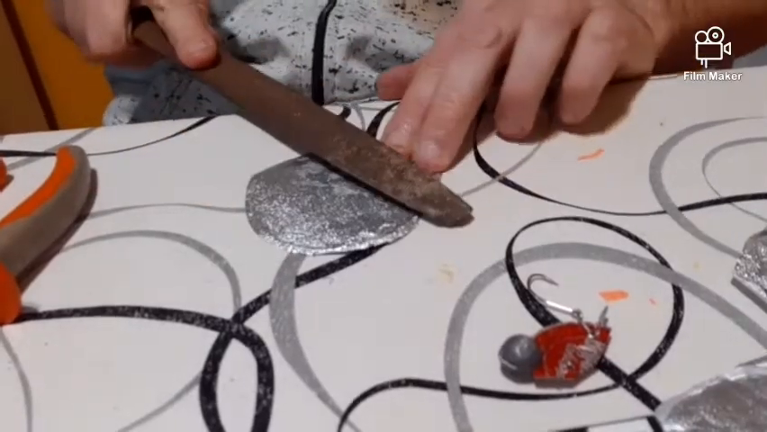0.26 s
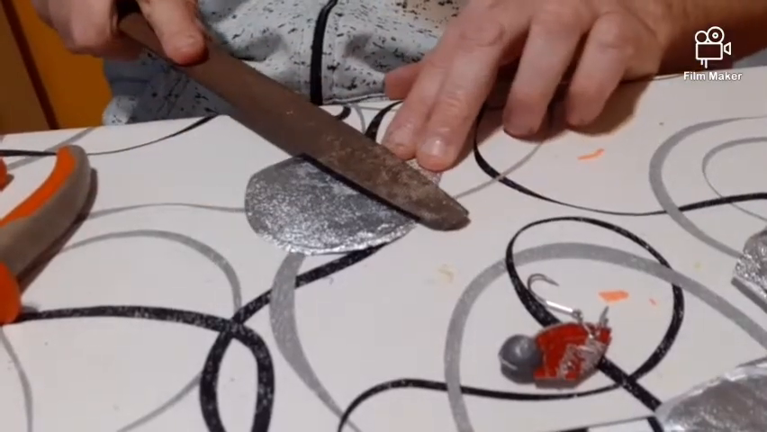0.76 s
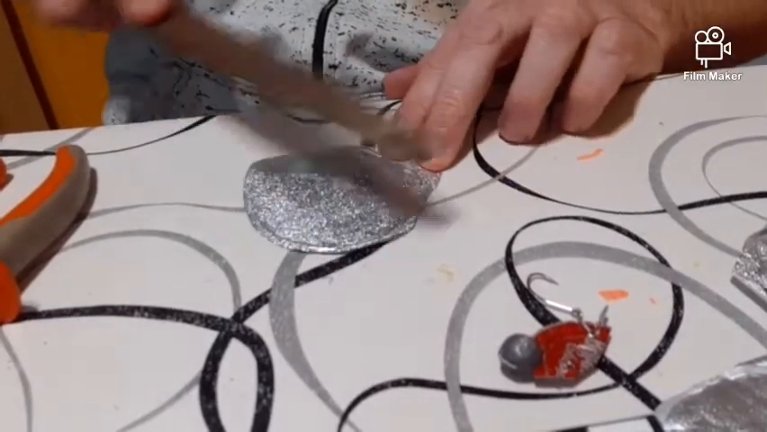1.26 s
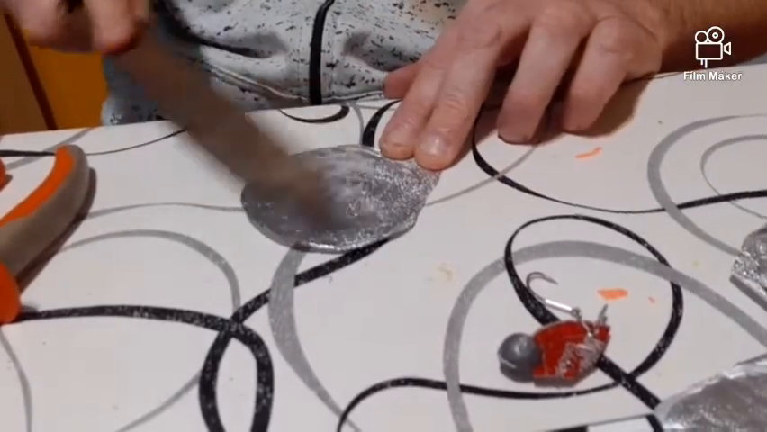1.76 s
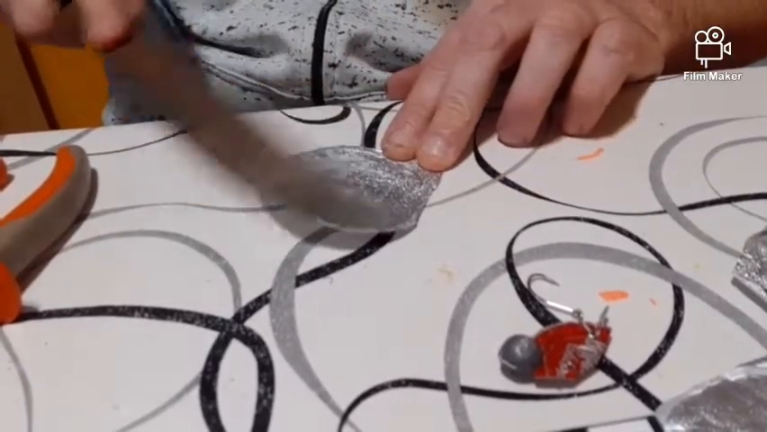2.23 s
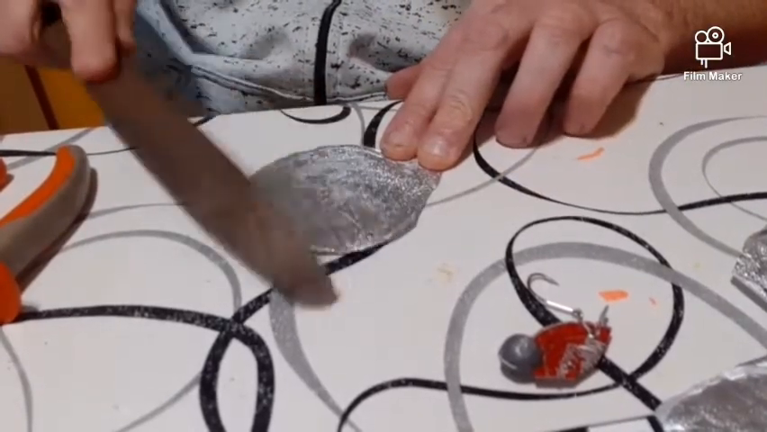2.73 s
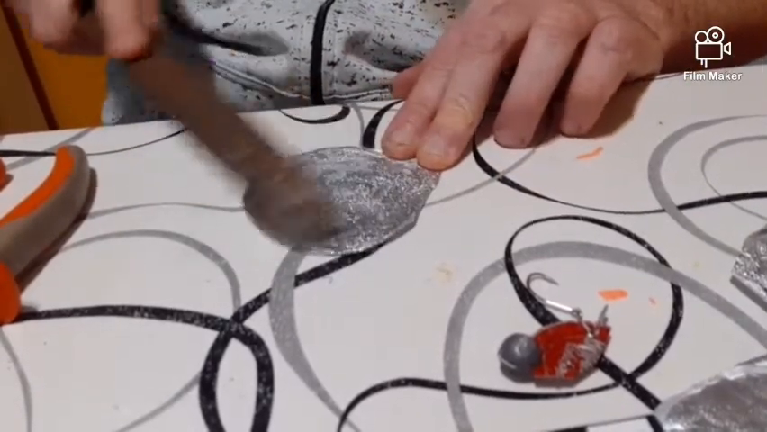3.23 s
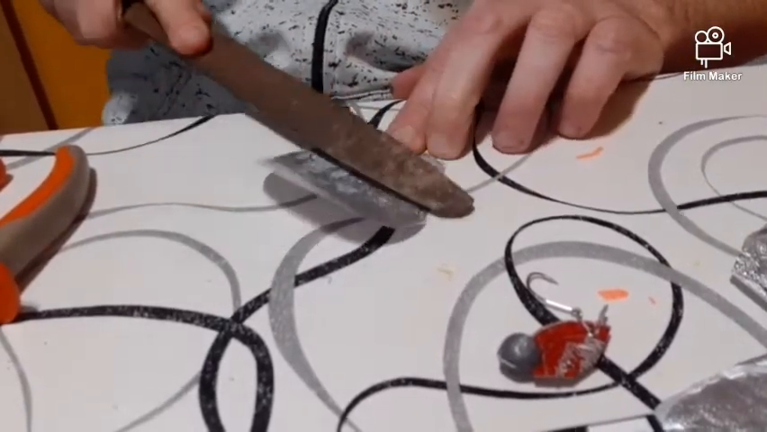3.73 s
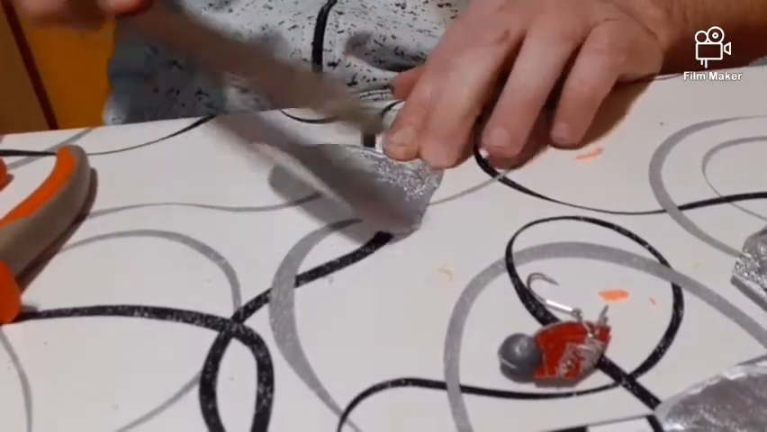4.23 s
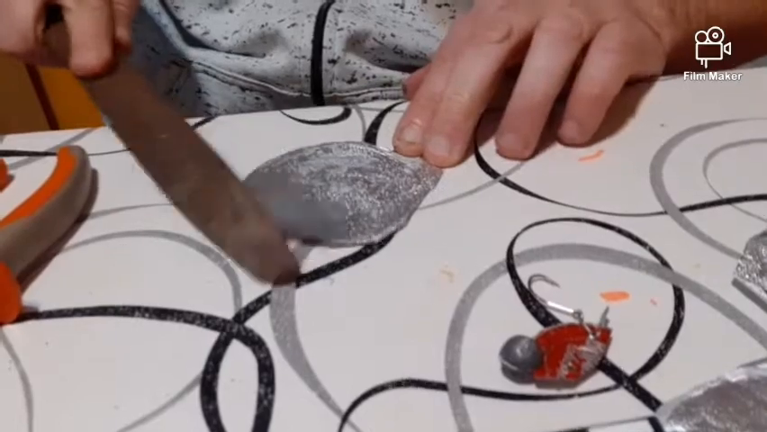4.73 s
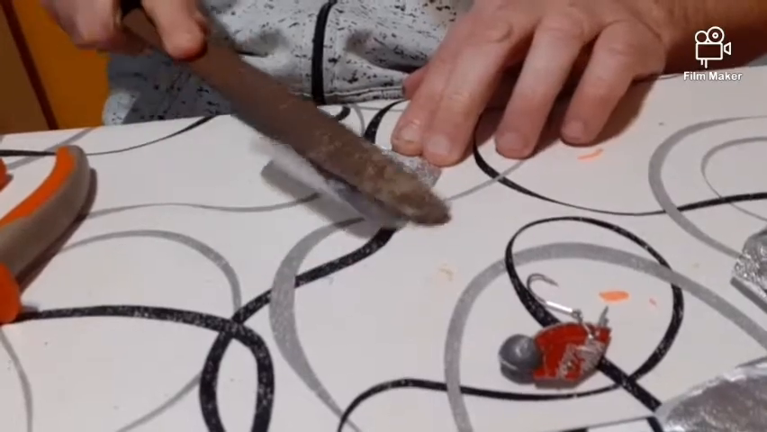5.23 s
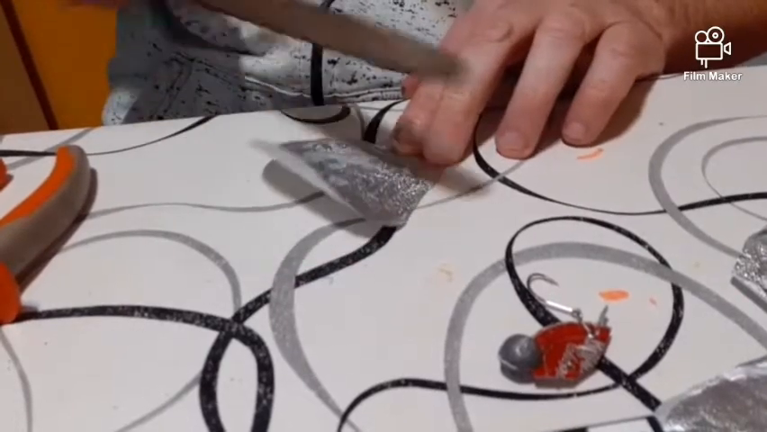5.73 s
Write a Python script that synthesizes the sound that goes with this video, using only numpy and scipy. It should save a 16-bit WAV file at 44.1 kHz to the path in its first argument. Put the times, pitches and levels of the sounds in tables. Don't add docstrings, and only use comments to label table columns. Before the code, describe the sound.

Close, dry scraping of steel on thin foil laid on a resonant tabletop. It starts faintly with light scuffs, then settles into regular passes: knock, grainy rasp, crinkle. Midway the strokes grow fuller, then a short blade chatter and bright foil snaps appear, some leaning left or right. A small microphone catches a short indoor room reflection and a quiet low background hum.

```python
import sys
import numpy as np
from scipy import signal
from scipy.fft import rfft, irfft, next_fast_len
from scipy.io import wavfile
from scipy.ndimage import uniform_filter1d

SR = 44100
rng = np.random.default_rng(int(sys.argv[2]) if len(sys.argv) > 2 else 0)


def field_ratio(decibels):
    return 10 ** (np.asarray(decibels, dtype=float) / 20)


def to_wav(s):
    ch = np.atleast_2d(s).T
    pcm = np.round(np.clip(ch, -1, 1) * 32767)
    wavfile.write(sys.argv[1], SR, pcm.astype(np.int16))


N = 263982

# freq_hz, level_db_per_hz
HUSH_SPECTRUM = [(12, -44), (20, -37), (49, -25), (127, 6.5), (257, -4), (295, 1.5), (380, -22),
                 (414, -2.5), (612, -27.5), (811, -14), (959, -29), (1200, -33.5), (1310, -47),
                 (1420, -39.5), (16300, -44)]
# freq_hz, left_right_likeness
HUSH_LIKENESS = [(60, 1), (240, 0.9), (950, 0.13), (3770, 0.053), (15000, 0.02)]

# time_s, rumble_db
REST = [(0, -59), (.3, -51), (.52, -55), (.88, -62), (1.1, -42), (1.25, -54), (1.95, -52), (2.28, -42),
        (2.42, -53), (2.6, -42), (2.8, -58), (3.1, -60), (3.5, -50), (3.93, -41), (4.15, -50), (5.0, -48),
        (5.5, -52), (5.7, -74)]
# fastest_s, speedup_s, slowdown_s, rub_db, table_weight_db
SWEEPS = [(.07, .09, .14, -72, 2), (1.008, .063, .1, -44, 2), (1.63, .05, .07, -50, 0),
          (1.722, .085, .063, -38, -9), (2.075, .06, .08, -55, 8), (2.175, .11, .1, -41.5, -1),
          (2.59, .065, .1, -53, 6), (2.718, .08, .095, -43, -1), (3.335, .115, .11, -40.5, -3),
          (3.63, .1, .09, -70, -2), (4.035, .12, .17, -45.5, 3), (4.585, .06, .1, -53, 2),
          (4.7, .13, .135, -40.5, -2), (5.275, .045, .12, -54.5, 0), (5.405, .065, .11, -47, 5),
          (5.56, .12, .1, -52, 1)]
# time_s, grit_db
TILT = [(.2, 3), (1, -1), (1.25, 1), (1.7, -4), (2.1, -3), (2.62, -5), (2.75, -1), (3.25, 0), (3.38, -2),
        (3.6, 3), (4.05, 1), (4.2, 4), (4.57, -3), (4.68, 1), (4.78, -3), (5.4, 3), (5.5, -5), (5.7, 0)]
# peak_s, level_db, brightness_db
TOUCHES = [(.231, -57, -8), (.71, -80, 8), (.929, -66, 0), (.949, -55, 3), (1.16, -57, 5), (4.952, -50, 5),
           (5.357, -54, 8), (1.576, -43, 2.5), (2.019, -50, 5), (2.485, -51, 4), (3.157, -56, 5),
           (3.752, -69, -12), (3.83, -68, 0), (4.44, -68, 4), (4.521, -56, 6), (5.13, -74, 6),
           (5.234, -60, 6), (5.966, -47, -2)]
# peak_s, level_db, rise_20db_s, fall_20db_s, brightness_db
SCUFFS = [(.084, -55.5, .045, .06, 3), (.25, -70, .01, .015, 10), (.318, -48, .02, .055, 2),
          (1.124, -47, .012, .03, -20), (1.215, -38, .065, .025, 1), (1.49, -69, .004, .2, -20),
          (1.828, -67, .012, .015, 6), (2.298, -43.5, .018, .05, -12), (2.333, -46, .07, .016, 3),
          (2.856, -59, .03, .02, 6), (3.484, -52, .006, .04, 4), (3.512, -46, .01, .07, -4),
          (3.608, -60, .008, .05, 0.5), (3.81, -68, .07, .02, -6), (4.188, -46, .004, .03, -3),
          (4.2, -56, .03, .06, 4), (4.226, -40, .013, .03, 4), (4.49, -45, .03, .14, -13),
          (4.876, -44, .02, .07, -4), (4.978, -40, .018, .014, 10), (5.03, -61, .05, .08, -7),
          (5.631, -42, .012, .012, 6), (5.68, -64, .05, .17, -2)]

# freq_hz, level_db, t60_s
TABLE_MODES = [(59.6, -16, 0.12), (96.2, 2.5, 0.35), (110, -1.5, .2), (129.5, -9, 0.15), (136.8, -5, 0.3),
               (165, -9, 0.14), (253.5, -2, 0.16), (274, -9, 0.3), (352.6, -7, 0.085), (408, -10, 0.1),
               (476, -15.5, 0.087), (615, -17.5, 0.034), (720, -16.5, 0.054)]
# start_s, blow_db, ring_time_factor, upper_modes_db
LANDINGS = [(0.225, -35.5, 1.4, -11), (0.327, -25, 1.2, -15), (1.034, -31, 1, -5), (1.487, -19, 1.33, -10),
            (1.578, -19.5, 1.54, -13), (1.618, -26, 1, -13), (2.021, -11.5, 1.2, -5),
            (2.4835, -19.5, 0.9, -9), (2.533, -26, 1, -9), (3.1595, -27.5, 1.4, -11),
            (3.752, -29, 0.6, -19), (3.8305, -24.5, 0.6, -9), (4.281, -30, 1.1, -11),
            (4.444, -31, 0.83, -6.5), (5.131, -34, 0.93, -17), (5.232, -29.5, 0.9, -21),
            (5.962, -21, 1, -5)]
# start_s, level_db
KNOCKS = [
    (2.023, -31),
    (2.875, -40),
    (2.886, -41.5),
    (3.511, -45),
]
# freq_hz, level_db, t60_s
LID_MODES = [(525, 2, 0.056), (660, 5.5, 0.019), (825, 1, 0.028), (1040, -29, .03)]

# freq_hz, level_db_per_hz
FOIL_SPECTRUM = [(210, -21), (350, 8), (404, 5.5), (474, 8.5), (817, 0.5), (3450, 0.5), (5140, -8),
                 (7430, -11.5), (8310, -16.5), (12000, -11), (16000, -17.5)]
# freq_hz, share
SLIP_LIKENESS = [(500, 0.78), (4000, 0.76), (9000, 0.2), (16000, 0.53)]
# start_s, end_s, level_db, first_hz, last_hz
HUMS = [(.225, 0.303, -68, 2410, 2380), (.3, 0.438, -70.5, 2400, 2400), (.93, 1.004, -52, 2380, 2360),
        (1.485, 1.6, -65, 2460, 2430), (1.85, 2.001, -77, 1820, 1800), (2.565, 2.645, -42, 400, 250),
        (2.69, 2.77, -48, 490, 470), (2.92, 3.139, -78.5, 1200, 1210), (3.38, 3.757, -52, 139.4, 134.8),
        (4.27, 4.45, -52, 126.5, 133), (4.48, 4.62, -47, 800, 620), (.06, .13, -60, 3700, 3700),
        (.07, .17, -64, 5400, 5400), (.298, .335, -54, 2400, 2350), (5.625, 5.7, -62, 2800, 2750),
        (2.06, 2.105, -40, 265, 305), (4.64, 4.85, -47, 290, 255), (5.68, 5.952, -80, 1396, 1484),
        (5.68, 5.949, -83, 2530, 2500)]

# peak_s, peak_db, centre_hz, decay_s,
# left_minus_right_db
SNAPS = [(0.0697, -38, 5410, 0.004, -1), (0.0853, -37, 3740, 0.004, 0), (.246, -52, 9000, .002, 0),
         (.294, -46, 7500, .002, 0), (0.3036, -40, 2390, 0.003, -1), (0.326, -40, 4500, 0.0023, -1),
         (1.1219, -30, 2170, 0.0025, -0.5), (1.1957, -25, 2440, 0.0023, -1), (1.213, -30, 5000, .002, -1),
         (1.222, -32, 2200, .002, -1), (2.2857, -32, 3290, 0.003, -1), (2.2964, -27, 2300, 0.0018, -3),
         (2.308, -26, 4000, 0.002, -2), (2.3115, -31, 1900, .002, -2), (2.3356, -33, 10000, 0.0019, 0),
         (2.8494, -42, 6030, 0.0023, -2), (3.498, -25, 5600, 0.0025, 9), (3.5095, -29, 5000, 0.003, -4),
         (3.5783, -39, 4030, 0.0023, -10), (3.6057, -35, 6100, 0.0036, -2), (4.1855, -29, 7000, 0.0025, 1),
         (4.2245, -22, 6000, 0.003, 9), (4.3844, -49, 4560, 0.0021, -1), (4.439, -47, 2580, 0.0023, -2),
         (4.846, -35, 7500, .002, 0), (4.8526, -31, 10700, 0.0021, 0), (4.8605, -29, 6000, 0.005, 8),
         (4.863, -32, 1500, .004, -2), (4.8727, -24, 6000, 0.003, -9), (4.915, -40, 1800, .004, -1),
         (5.648, -31, 6500, .003, 10)]
# peak_s, peak_db, centre_hz, decay_s, left_minus_right_db
TICKS = [(0.2284, -50, 2380, 0.0014, 1), (0.7104, -58, 3860, 0.0023, 1), (0.9298, -58, 2370, 0.0025, -1),
         (1.498, -59, 1590, 0.0023, 0.5), (1.553, -54, 2570, 0.006, -3), (1.5718, -29, 2400, 0.0062, -4),
         (2.0168, -37, 2550, 0.0023, 2), (2.4815, -37, 6000, 0.003, -1), (3.1556, -33, 6350, 0.005, -2),
         (3.8277, -32, 5890, 0.0063, 3.5), (4.28, -40, 4650, 0.0033, -2), (4.4226, -57, 2080, 0.002, -4),
         (5.132, -50, 2240, 0.0026, -1), (5.2322, -33, 5950, 0.0033, -6), (5.9639, -22, 6950, 0.0021, -8)]
# peak_s, peak_db, centre_hz, decay_s, left_minus_right_db
TEARS = [
    (3.489, -29, 5500, .003, -9),
    (4.9621, -32, 7000, 0.006, -2),
    (4.9766, -18, 9500, 0.002, -1.5),
    (5.6322, -18, 6500, 0.0016, 12),
]
# start_s, peak_db, pitch_hz, left_minus_right_db
POPS = [(.2295, -43, 2400, -2), (.264, -49, 2400, 0), (.307, -35, 7500, -1), (3.5102, -27, 1700, -5),
        (3.5125, -33, 1900, -4), (3.5795, -38, 5000, -10), (3.6075, -43, 2500, -2),
        (4.1865, -25, 2900, 1.5), (4.2222, -26, 4800, -8), (4.229, -27, 1900, -1), (4.2312, -31, 1900, -1),
        (4.8758, -23, 2000, -5), (4.8798, -29, 2400, -4), (4.9785, -21, 11500, -1.5),
        (5.6333, -19, 7600, 6)]

# time_s, level_db
CHATTER = [
    (4.46, -53),
    (4.496, -38),
    (4.554, -40),
    (4.564, -44),
    (4.63, -50.5),
    (4.64, -45),
]
# freq_hz, width_hz, level_db
BLADE_MODES = [(729, 90, 1.5), (820, 90, -6), (1820, 110, 6), (2160, 450, 14), (2580, 61, 2)]

# freq_hz, t60_s
WALLS = [(100, 0.1), (1000, 0.41), (2500, 0.27), (6000, 0.35), (9000, 0.24), (16000, 0.3)]
# delay_s, level_db
ECHOES = [(.0031, -19.5), (.017, -14), (0.033, -21)]


def evened(x):
    return x / np.sqrt(np.mean(x ** 2) + 1e-20)


def read(points, hz):
    f, value = np.transpose(points)
    return np.interp(np.log(hz + 1), np.log(f + 1), value)


def add(mix, start_s, sound):
    part = mix[..., max(round(start_s * SR), 0):][..., :sound.shape[-1]]
    part += sound[..., :part.shape[-1]]


def panned(level_db, left_minus_right_db):
    return field_ratio(level_db + np.array([[left_minus_right_db], [-left_minus_right_db]]) / 2)


def band(x, lo_hz, hi_hz):
    return signal.sosfilt(signal.butter(2, [lo_hz, hi_hz], "band", fs=SR, output="sos"), x)


def ring(modes, stretch=1, seconds=0.36, swell_cycles=1e-3):
    t = np.arange(round(seconds * SR)) / SR
    out = np.zeros(len(t))
    for hz, db, t60_s in modes:
        decay = field_ratio(db - 60 * t / (t60_s * stretch))
        out += decay * np.sin(2 * np.pi * hz * t) * (1 - np.exp(-t * hz / swell_cycles))
    return out


def wobble(span_s):
    span = round(span_s * SR)
    return evened(uniform_filter1d(uniform_filter1d(rng.standard_normal(N), span), span))


def hush():
    frames, hz = N // 256 + 5, np.fft.rfftfreq(1024, 1 / SR)
    a, b, c, d, patches = rng.standard_normal((frames, 513, 5)).T
    patches = evened(uniform_filter1d(uniform_filter1d(patches, 4, 0), 14, 1))
    same = read(HUSH_LIKENESS, hz)[:, None]
    left = a + 1j * b
    right = same * left + np.sqrt(1 - same ** 2) * (c + 1j * d)
    z = np.array([left, right]) * field_ratio(read(HUSH_SPECTRUM, hz)[:, None] + 0.5 * patches)
    return field_ratio(-56.5) * evened(signal.istft(z, nperseg=1024, noverlap=768)[1][:, :N])


def contact():
    t = np.arange(0, N / SR, 1e-3)
    power = np.zeros((5, len(t)))
    tilt_db = np.interp(t, *np.transpose(TILT))
    power[4] = field_ratio(np.interp(t, *np.transpose(REST))) ** 2
    for s, rise_s, fall_s, db, weight_db in SWEEPS:
        phase = (t - s) / np.where(t < s, rise_s, fall_s)
        late = np.clip(phase, -1, 1)
        rub_db = db - 20 * abs(phase) ** 2.1
        drag_db = -1.5 + .7 * weight_db + 3 * late
        grit_db = -1.5 - 9 * late + tilt_db
        fizz_db = 2.2 - 5 * late + .5 * tilt_db
        rumble_db = 7 + weight_db + 4 * late
        power += field_ratio(rub_db + np.array([drag_db, 0 * t, grit_db, fizz_db, rumble_db])) ** 2
    touch_rise_s, touch_fall_s, touch_drag_db = .004, .065, -3
    brief = [(s, db, touch_rise_s, touch_fall_s, bright_db, touch_drag_db) for s, db, bright_db in TOUCHES]
    brief += [(*row, -11 - .3 * row[-1]) for row in SCUFFS]
    for s, db, rise_s, fall_s, bright_db, drag_db in brief:
        rub_db = db - 20 * abs(t - s) / np.where(t < s, rise_s, fall_s)
        power[:4] += field_ratio(rub_db + np.array([[drag_db], [0], [bright_db - .5], [bright_db - 4.5]])) ** 2
    gains = uniform_filter1d(np.sqrt(power), size=3)
    return [np.interp(np.arange(N) / SR, t, gain) for gain in gains]


def landing_modes(upper_db):
    modes = []
    for (hz, db, t60_s), spot in zip(TABLE_MODES, rng.standard_normal(len(TABLE_MODES))):
        if hz > 200:
            shift_db = upper_db + 4.5
        elif hz < 120:
            shift_db = 4
        else:
            shift_db = -2.5
        modes.append((hz, db + 1.5 * spot + shift_db, t60_s))
    first_give = (230, 6 + .7 * (upper_db + 9), .022)
    return modes[:3], modes[3:] + [first_give]


def table(rumble):
    shake = rng.standard_normal(N) * field_ratio(1.1 * wobble(0.0062)) * rumble
    out = field_ratio(-1.0) * signal.oaconvolve(shake, evened(ring(TABLE_MODES, 0.45)) / np.sqrt(SR / 2))[:N]
    push = signal.windows.hann(round(SR / 695))
    for s, db, stretch, upper_db in LANDINGS:
        bass, top = landing_modes(upper_db)
        response = ring(bass, stretch * .6, swell_cycles=.6) + ring(top, stretch, swell_cycles=0.2)
        thump = signal.oaconvolve(response, push)
        add(out, s + 0.00278, field_ratio(db - 1.5) * thump / abs(thump).max())
    for s, db in KNOCKS:
        add(out, s, field_ratio(db - 7) * ring(LID_MODES, seconds=.1))
    return out


def grit(per_s, spread_db):
    slips = (rng.random((3, N)) < per_s / SR) * rng.standard_normal((3, N))
    return slips * field_ratio(spread_db * np.minimum(rng.exponential(1, (3, N)), 4))


def patchy(x, depth_db):
    z = signal.stft(x, nperseg=512)[2]
    field = uniform_filter1d(uniform_filter1d(rng.standard_normal(z.shape[1:]), 7, 0), 5, 1)
    return signal.istft(z * field_ratio(depth_db * evened(field)), nperseg=512)[1][:, :N]


def strokes(gains):
    pressure = field_ratio(1.1 * wobble(.004) + .6 * wobble(.015))
    slips = grit(per_s=12000, spread_db=2.2) * pressure
    size = next_fast_len(N)
    hz = np.fft.rfftfreq(size, 1 / SR)
    z = rfft(patchy(slips, depth_db=1.4), size)
    same = read(SLIP_LIKENESS, hz)
    z = (same * z[0] + np.sqrt(1 - same ** 2) * z[1:]) * field_ratio(read(FOIL_SPECTRUM, hz))
    low = 1 / (1 + (hz / 1500) ** 4)
    top = 1 / (1 + (4600 / (hz + 1)) ** 6)
    fine = 1 / (1 + (8800 / (hz + 1)) ** 10)
    layers = zip([low, 1 - low - top, top - fine, fine], gains)
    return sum(evened(irfft(z * share, size)[:, :N]) * gain for share, gain in layers)


def hums():
    out = np.zeros(N)
    for start_s, end_s, db, first_hz, last_hz in HUMS:
        width_hz = 20 + .06 * first_hz
        t = np.arange(start_s, end_s, 1 / SR)
        noise = [1, 1j] @ rng.standard_normal((2, SR // 2))
        fuzz = signal.lfilter([1], [1, -np.exp(-np.pi * width_hz / SR)], noise)
        turns = np.cumsum(np.linspace(first_hz, last_hz, len(t))) / SR
        tone = evened((fuzz[-len(t):] * np.exp(2j * np.pi * turns)).real)
        add(out, start_s, field_ratio(db) * tone * signal.windows.tukey(len(t), .4))
    return out


def snaps():
    out, t = np.zeros((2, N)), np.arange(-882, 2200) / SR
    snap_build_s, tear_build_s = .0008, .0055
    rows = [(*row, snap_build_s) for row in TICKS + SNAPS] + [(*row, tear_build_s) for row in TEARS]
    for s, db, hz, fall_s, pan_db, rise_s in rows:
        z = rng.standard_normal((2, len(t)))
        crackle = z[0] * abs(z[1]) + 5 * (t == 0)
        bump = evened(band(crackle, hz / 1.39, hz * 1.296))
        crack = 0.72 * (hz / 3500) ** .7 * evened(band(crackle, 630, 16000))
        snap = (bump + crack) * np.exp(np.where(t < 0, t / rise_s, -t / fall_s))
        add(out, s + 0.0021 + t[0], panned(db - 0.5, pan_db) * snap / abs(snap).max())
    return out


def pops():
    out, t = np.zeros((2, N)), np.arange(441) / SR
    for s, db, hz, pan_db in POPS:
        pop = np.sin(2 * np.pi * hz * t) * np.exp(-t * hz / 1.05)
        add(out, s, panned(db + 4, 2 * pan_db / 2) * pop / pop.max())
    return out


def chatter():
    s, db = np.transpose(CHATTER)
    t, out = np.arange(s[0], s[-1], 1 / SR), np.zeros(N)
    slips = rng.standard_normal(len(t)) * (rng.random(len(t)) < 2500 / SR)
    modes = [(hz, level_db, 5.2 / width_hz) for hz, width_hz, level_db in BLADE_MODES]
    sound = evened(signal.oaconvolve(slips, ring(modes, seconds=.1))[:len(t)])
    add(out, s[0], sound * field_ratio(np.interp(t, s, db)) * signal.windows.tukey(len(t), .3))
    return out


def room(x, tail_db, count=3):
    out, turn = x.copy(), np.pi * np.arange(N) / SR * 7.3
    for k in range(count):
        taps = np.zeros((2, SR // 2))
        at = np.arange(200, SR // 2 - 20, 20)
        at = at + rng.integers(0, 20, (2, len(at)))
        np.put_along_axis(taps, at, rng.choice([-1., 1.], at.shape), 1)
        hz, t, z = signal.stft(taps, SR, nperseg=256)
        tail = signal.istft(z * field_ratio(-60 * t / read(WALLS, hz)[:, None]), SR, nperseg=256)[1]
        tail *= field_ratio(tail_db) / np.linalg.norm(tail[0])
        for delay_s, db in ECHOES:
            tail[[0, 1], round(delay_s * SR) + rng.integers(0, 40, 2)] += field_ratio(db)
        share = np.sqrt(2 / count) * abs(np.cos(turn + np.pi * k / count))
        out += signal.fftconvolve(x * share, tail, axes=1)[:, :N]
    return out


def scene():
    lean = field_ratio(np.array([[-.5], [.5]]))
    gains = contact()
    foil = field_ratio(-0.5) * (strokes(gains) + chatter() + hums()) * lean + snaps() + pops()
    near = room(foil, tail_db=-12) + room(table(gains[4]) * lean, tail_db=-8.5, count=2)
    port_lag_samples = 4
    return np.array([near[0], np.roll(near[1], port_lag_samples)]) + hush()


def top_cut(x):
    return signal.sosfilt(signal.butter(12, 16510, fs=SR, output="sos"), x)


def record(dry):
    thin = signal.sosfilt(signal.butter(3, 80.5, "high", fs=SR, output="sos"), dry)
    thin = signal.oaconvolve(thin, signal.firwin(1501, 15790, fs=SR)[None], "same")
    return top_cut(thin)


dry = scene()
out = record(dry)
to_wav(out)
```